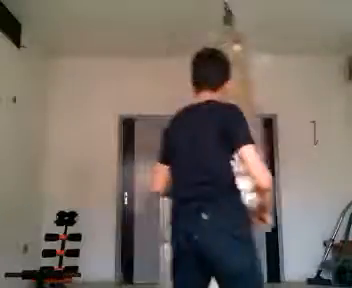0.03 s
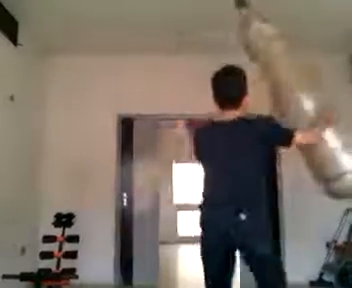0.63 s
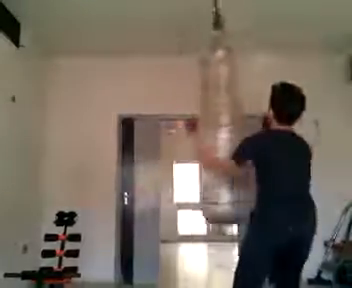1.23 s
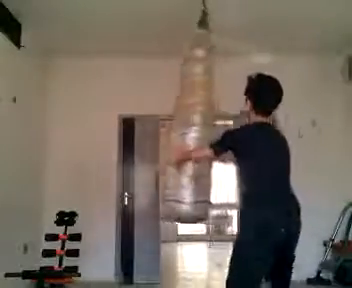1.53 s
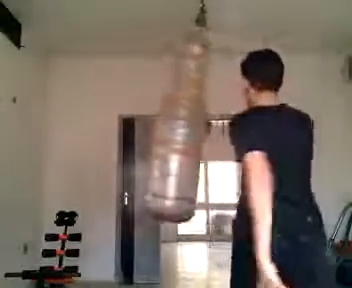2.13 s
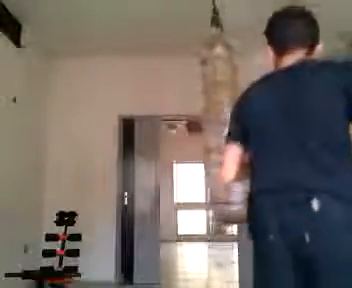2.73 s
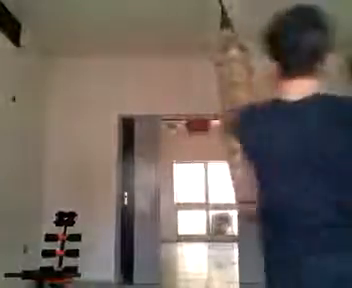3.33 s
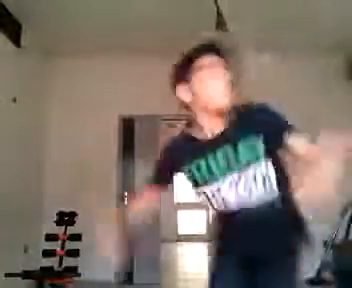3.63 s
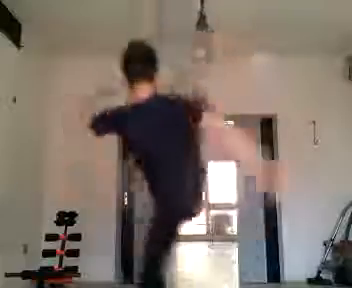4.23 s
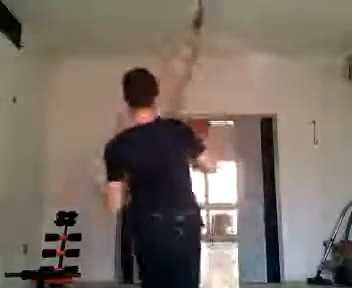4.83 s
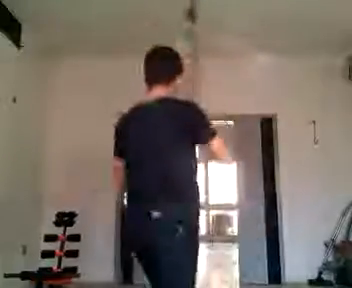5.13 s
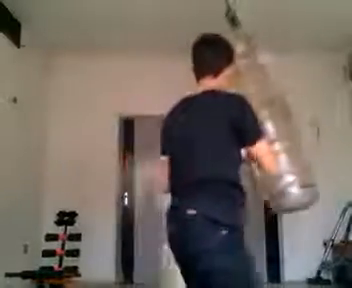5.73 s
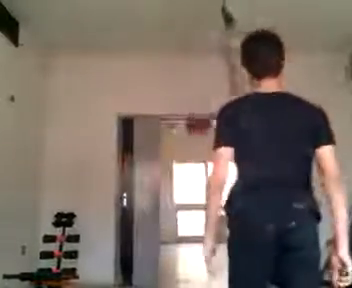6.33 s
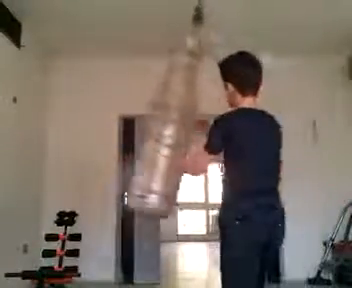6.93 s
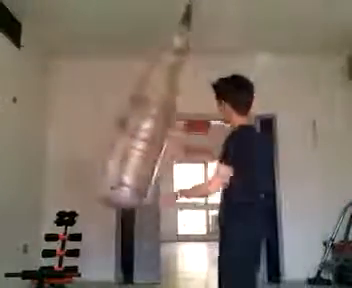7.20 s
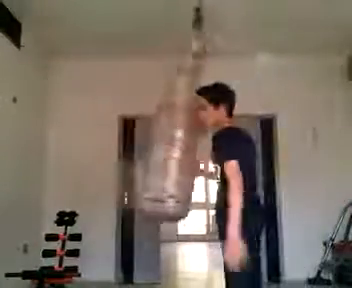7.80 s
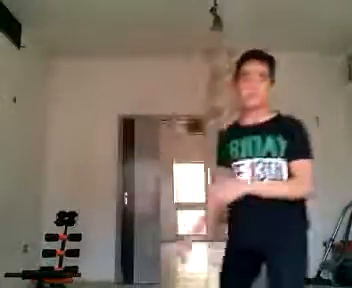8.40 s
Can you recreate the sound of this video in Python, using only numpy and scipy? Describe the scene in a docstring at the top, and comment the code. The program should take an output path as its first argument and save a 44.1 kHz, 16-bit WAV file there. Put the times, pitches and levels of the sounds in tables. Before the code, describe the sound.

Over a humming fan, feet bump and scuff on a hard floor, and one heavy kick thuds into a plastic-wrapped punching bag.

```python
"""Jumping kick on a punching bag

A kick lands on a plastic-wrapped bag in a bare, echoing room: the filling thuds, the wrap slaps.
The thud overloads a narrow-band microphone and leaves the room's modes beating.
Feet bump on the hard floor and soft scuffs come and go, over the hum and rush of a fan."""
import sys
import numpy as np
from scipy import signal
from scipy.fft import rfft, irfft
from scipy.io import wavfile
from scipy.ndimage import uniform_filter1d

SR = 44100
rng = np.random.default_rng(int(sys.argv[2]) if len(sys.argv) > 2 else 0)


def generate_wav(sig):
    """Save sig (samples, or channels by samples) to the path in sys.argv[1] as 16-bit PCM at SR."""
    pcm = np.round(np.clip(np.atleast_2d(sig).T, -1, 1) * 32767).astype(np.int16)
    wavfile.write(sys.argv[1], SR, pcm)


N = 373086


def amp(db):
    """Decibels to gain."""
    return 10 ** (np.asarray(db) / 20)


def unit_rms(x):
    """Scale to rms 1."""
    return x / np.sqrt(np.mean(x ** 2) + 1e-20)


def curve_at(points, hz):
    """Interpolate (Hz, value) rows on a log-frequency axis."""
    points_hz, values = np.transpose(points)
    return np.interp(np.log(hz + 1), np.log(points_hz + 1), values)


def add(mix, start_s, sound):
    """Mix a sound in at start_s."""
    part = mix[round(start_s * SR):][:len(sound)]
    part += sound[:len(part)]


def colour(x, spectrum, size=8192):
    """Minimum-phase filter of unit energy, shaped by (Hz, dB) rows."""
    log_gain = np.log(amp(curve_at(spectrum, abs(np.fft.fftfreq(size, 1 / SR)))))
    response = np.exp(np.conj(signal.hilbert(log_gain)))
    taps = np.fft.ifft(response).real[:size // 2]
    return signal.oaconvolve(x, taps / np.linalg.norm(taps))[:len(x)]


def noise(spectrum):
    """Steady noise of rms 1, shaped by (Hz, dB) rows."""
    gain = amp(curve_at(spectrum, np.fft.rfftfreq(N, 1 / SR)))
    return unit_rms(irfft(rfft(rng.standard_normal(N)) * gain, N))


def drift(rate_hz):
    """Slow random wander of rms 1."""
    gain = np.exp(-(np.fft.rfftfreq(N, 1 / SR) / rate_hz) ** 2)
    return unit_rms(irfft(rfft(rng.standard_normal(N)) * gain, N))


def low_pass(x, edge_hz, size):
    """Steep linear-phase low-pass."""
    return signal.oaconvolve(x, signal.firwin(size, edge_hz, window=("kaiser", 9), fs=SR), "same")


def diffuse_echo(size=1024):
    """Unit-energy response of dense echoes off bare walls; each band decays at its own rate."""
    # Each row: frequency in Hz, T60 in seconds.
    decay_times = [(60, 2), (170, 0.74), (400, 1.18), (800, 1.12), (2000, 1.35), (3800, 1.2)]
    hz, t, bands = signal.stft(rng.standard_normal(2 * SR), SR, nperseg=size)
    decay = amp(-60 * t / curve_at(decay_times, hz)[:, None])
    spectrum = rfft(signal.istft(bands * decay, SR, nperseg=size)[1][:2 * SR])
    spectrum /= np.sqrt(uniform_filter1d(abs(spectrum) ** 2, size=50))  # no pitch stands out
    tail = irfft(spectrum)[:3 * SR // 2]
    tail *= 1 - np.exp(-np.arange(len(tail)) / SR / 0.002)
    return tail / np.linalg.norm(tail)


def room(x, direct_db, early_db, early_decay_s):
    """Direct sound, early reflections off the nearest walls, and the diffuse echo."""
    reflections_per_s, first_s = 1500, 0.003
    t = np.arange(SR // 4) / SR
    taps = rng.choice([-1., 1.], len(t)) * (rng.random(len(t)) < reflections_per_s / SR)
    taps *= np.exp(-t / early_decay_s) * (t > first_s)
    early = signal.fftconvolve(x, taps / np.linalg.norm(taps))[:N]
    late = signal.fftconvolve(x, diffuse_echo())[:N]
    return amp(direct_db) * x + amp(early_db) * early + late


def impacts(blows, thud_spectrum, slap_spectrum, thud_gain_db, slap_gain_db):
    """Each blow is one dull push and a short crackle that builds as the surfaces slap together."""
    pushes, slaps = np.zeros(N), np.zeros(N)
    t = np.arange(SR // 4) / SR
    for start_s, push_db, slap_db, slap_decay_s in blows:
        add(pushes, start_s, amp([push_db]))
        contact = np.sqrt(t) * np.exp(-t / slap_decay_s)
        crackle = rng.standard_normal(len(t)) * (rng.random(len(t)) < 0.15) * contact
        add(slaps, start_s, amp(slap_db) * crackle / np.linalg.norm(crackle))
    thuds = amp(thud_gain_db) * colour(pushes, thud_spectrum)
    return thuds + amp(slap_gain_db) * colour(slaps, slap_spectrum)


def fan():
    """Motor hum in a steady rush of air; unsteady motor timing makes the high overtones waver most."""
    # Each row: frequency in Hz, rms level in dB.
    hum_lines = [(71.2, -56), (99.3, -41), (166, -51), (198.6, -31.5), (297.9, -51.5), (496.5, -45.5),
                 (893.7, -61), (993, -63.5), (1092.3, -60)]
    # Each row: frequency in Hz, relative noise density in dB.
    rush_spectrum = [(20, -17.5), (42, -7), (55, -14), (75, -1.5), (200, 0.5), (290, 0.5), (345, -1),
                     (400, 0), (650, 0), (870, -10.5), (1150, -15.5), (2200, -23), (2600, -28.5),
                     (3600, -37)]
    rush_db, jitter_s = -34.5, 0.00013
    t, hum = np.arange(N) / SR, np.zeros(N)
    for hz, db in hum_lines:
        peak = np.sqrt(2) * amp(db + 1.2 * drift(rate_hz=5))
        cycles = hz * t + rng.random() + hz * jitter_s * drift(rate_hz=2.2)
        hum += peak * np.sin(2 * np.pi * cycles)
    return hum + noise(rush_spectrum) * amp(rush_db + 0.96 * drift(rate_hz=2.8))


def scuffs():
    """Soft, grainy swishes of feet and clothes: each swells, then dies away with the room."""
    # Each row: start in seconds, swell time in seconds, level in dB.
    swishes = [(-.03, 0.052, -39), (.13, 0.084, -37.5), (.47, .13, -35), (.96, 0.054, -36.5),
               (1.07, 0.079, -44.5), (1.40, 0.074, -39), (1.81, 0.035, -39), (2.99, 0.045, -47),
               (3.62, 0.082, -48), (3.93, .07, -41.5), (4.25, 0.067, -48.5), (5.17, 0.2, -31.5),
               (5.70, 0.22, -35.5), (5.92, 0.066, -36.5), (6.30, 0.043, -38), (6.80, 0.044, -35.5),
               (7.03, .06, -44.5), (7.21, 0.048, -39.5), (7.58, 0.096, -49)]
    # Each row: frequency in Hz, relative level in dB.
    swish_spectrum = [(150, -12.5), (500, 7.5), (800, 3), (1200, -2), (2200, -2), (2700, -10), (3400, -6.5),
                      (4000, -30)]
    t60_s, grain_db = 1.0, 1.4
    t, power = np.arange(N) / SR, np.zeros(N)
    for start_s, swell_s, db in swishes:
        rise = np.clip((t - start_s) / swell_s, 0, 1)
        fade_db = -60 * np.maximum(t - start_s - swell_s, 0) / t60_s
        power += (rise * amp(db + fade_db)) ** 2
    return noise(swish_spectrum) * np.sqrt(power) * amp(grain_db * drift(rate_hz=60))


def footsteps():
    """Heel bumps and sole slaps on the hard floor, and light pats of hands on the bag, heard mostly through the
    room."""
    # Each row: start in seconds, bump and slap in relative dB, slap decay in seconds.
    steps = [(.232, -9, 5.5, 0.013), (.281, -7, -6, 0.025), (.788, -12.5, -23, 0.015),
             (1.175, -8.5, -5, 0.038), (1.245, -8.5, -14, .02), (3.298, -12.5, -7.5, 0.0041),
             (3.331, -11, -19.5, 0.0059), (3.716, -11.5, -15, 0.026), (5.170, -8.5, -16.5, 0.0056),
             (5.318, 0, 2.5, 0.013), (5.405, -6, -21.5, .01), (6.818, -20.5, -4, 0.032),
             (6.964, -10, -20, 0.014), (7.861, -14, -14, .01), (7.973, -13.5, -20, .01)]
    # Each row of both spectra: frequency in Hz, relative level in dB.
    heel_spectrum = [(40, -19), (120, -9), (330, -4), (500, 3), (680, -3), (1000, -18.5), (3000, -36)]
    sole_spectrum = [(150, -13.5), (500, 4.5), (700, 4), (900, 6.5), (1300, -2.5), (2200, -0.5), (2650, -9),
                     (3400, -10), (4000, -12.5)]
    feet = impacts(steps, heel_spectrum, sole_spectrum, thud_gain_db=9.5, slap_gain_db=-1)
    return room(feet, direct_db=-4, early_db=-5, early_decay_s=0.067)


def standing_waves():
    """The room's modes ring on after a heavy blow and beat against each other."""
    # Each row: frequency in Hz, relative level in dB, T60 in seconds.
    modes = [(61.7, -12, 1.4), (76.5, -4, 1.4), (79.2, -4, 1.4), (99.1, -4, 1.4), (115.1, 0, 1.4),
             (142.5, -5, 1.4), (147.7, -4, 1.4), (177.5, -10, 1.4), (181.2, -1, 1.4), (231.1, -6, 1.1),
             (254.9, -5, 1.1), (279.3, -6, 1.1), (318.3, -5, 1.1), (333.6, 0, 1.1), (359.2, -4, 1.1),
             (401.2, -7, 1.1), (438.4, -5, 1.1), (459.4, -5, 1.1), (484.7, -7, 1.1), (597.0, -6, 1.1),
             (638.4, -8, 1.1), (690.1, -8, 1.1)]
    attack_s = 0.003
    t = np.arange(2 * SR) / SR
    ring = sum(amp(db - 60 * t / t60_s) * np.sin(2 * np.pi * (hz * t + rng.random()))
               for hz, db, t60_s in modes)
    return ring * (1 - np.exp(-t / attack_s))


def kick():
    """The foot brushes the wrapping, lands and sinks into the filling; the whole room booms."""
    # Each row: start in seconds, thud and slap in relative dB, slap decay in seconds.
    blows = [(4.522, -31.5, -18.5, 0.0066), (4.533, -21.5, -7.5, 0.0043), (4.538, -2, -5, 0.0063),
             (4.551, 3, -1.5, 0.0058), (4.582, 2.5, -6.5, 0.021)]
    # Each row of both spectra: frequency in Hz, relative level in dB.
    filling_spectrum = [(25, -12.5), (55, -19.5), (80, -5.5), (180, 1), (340, 1), (500, -0.5), (690, -4.5),
                        (900, -12), (1500, -23.5), (3500, -48.5)]
    wrap_spectrum = [(100, -15.5), (400, 6), (900, 1.5), (1400, 3.5), (2200, 0), (2650, -5.5), (3400, -6.5),
                     (4000, -18.5)]
    bag = impacts(blows, filling_spectrum, wrap_spectrum, thud_gain_db=25, slap_gain_db=18.5)
    boom = room(bag, direct_db=-1.5, early_db=-2.5, early_decay_s=0.054)
    landing_s = blows[2][0]  # first heavy blow
    add(boom, landing_s, amp(-13.5) * standing_waves())
    return boom


def scene():
    """All sources at the microphone, mono."""
    return (kick() + footsteps() + scuffs() + fan())[None]


def record(dry):
    """A narrow-band input flattens the loudest peaks; a thin, bright part of the overtones gets through."""
    band_hz, edge_hz = 3760, 15800
    ceiling, knee = 0.71, 18
    narrow = low_pass(dry[0], band_hz, size=601)
    clipped = narrow / (1 + abs(narrow / ceiling) ** knee) ** (1 / knee)
    distortion = clipped - narrow
    fizz = distortion - low_pass(distortion, band_hz, size=601)  # overtones above the band
    crunch = amp(-11) * fizz + amp(-8) * np.diff(fizz, prepend=0)
    return low_pass(clipped - fizz + crunch, edge_hz, size=511)[None]


dry = scene()
out = record(dry)
generate_wav(out)
```